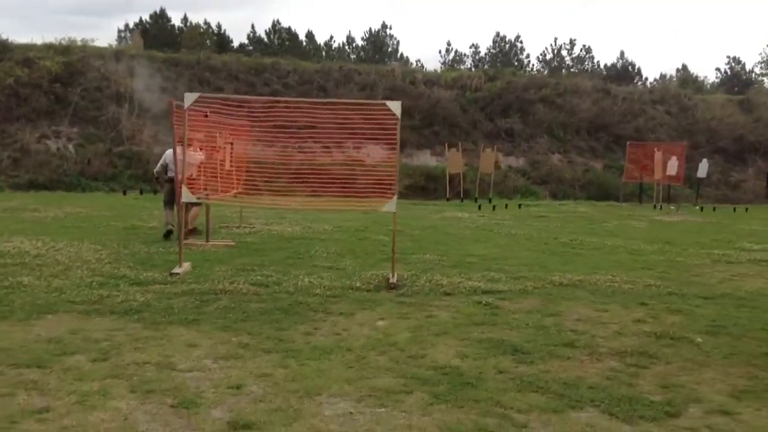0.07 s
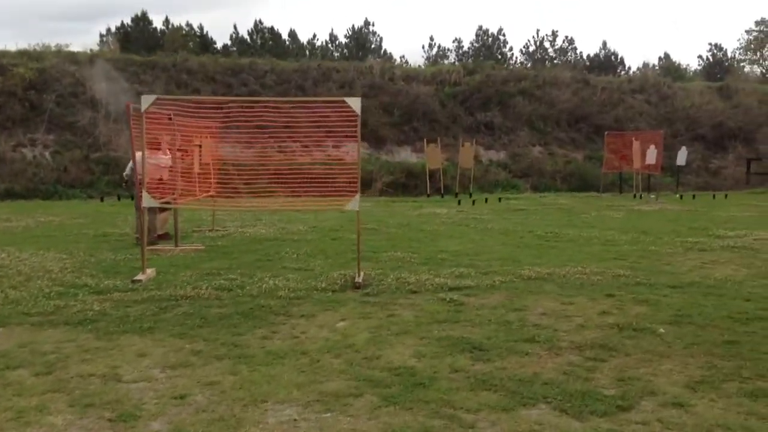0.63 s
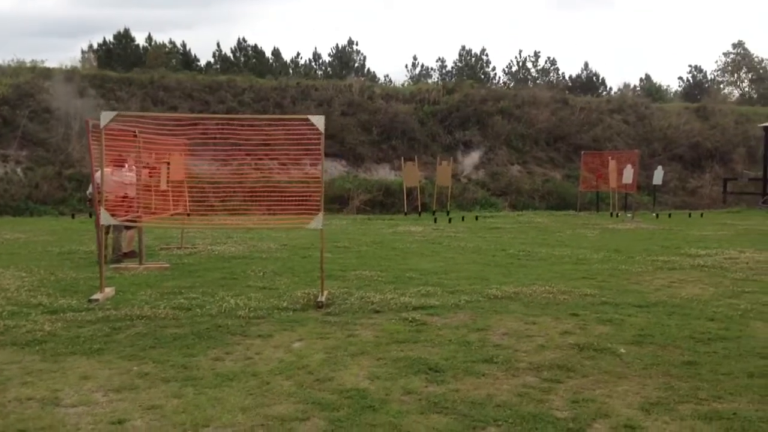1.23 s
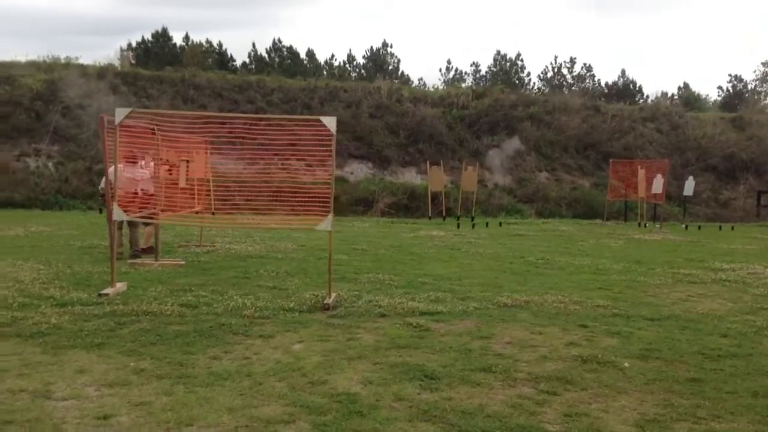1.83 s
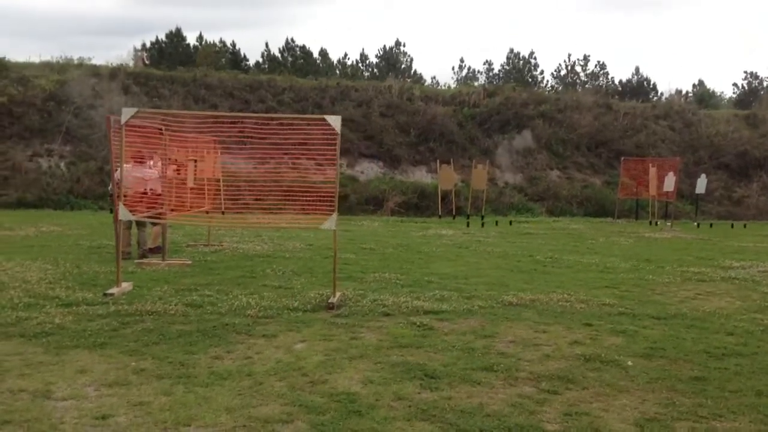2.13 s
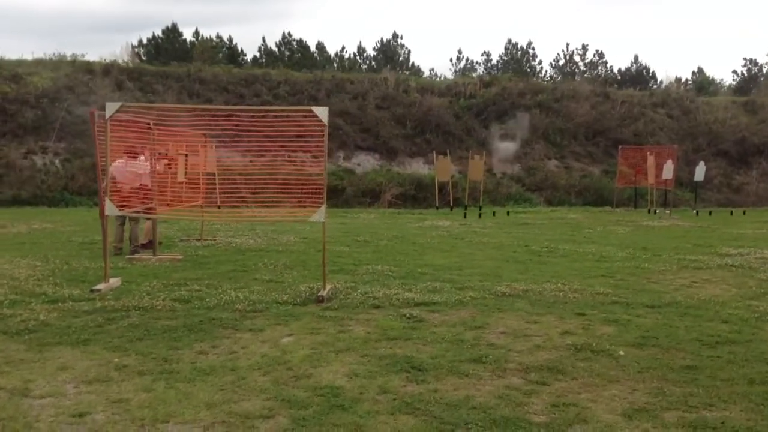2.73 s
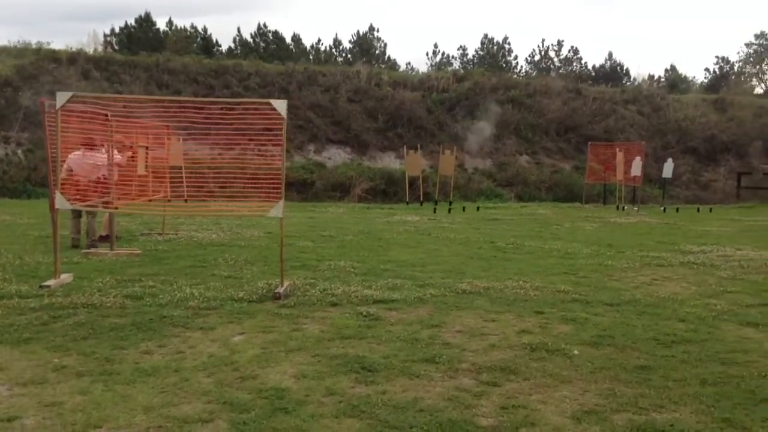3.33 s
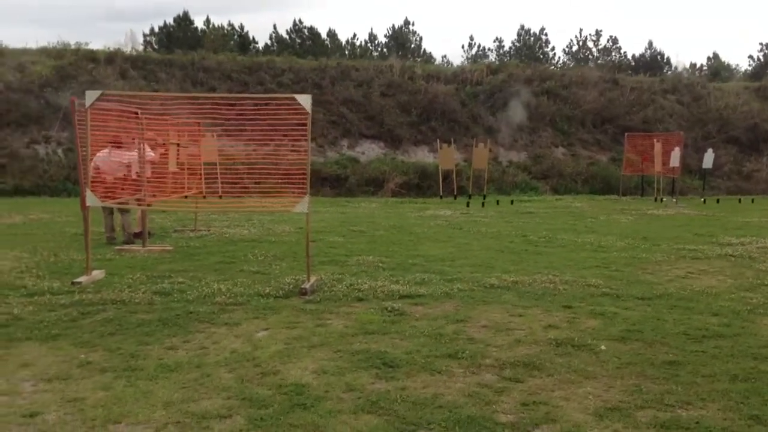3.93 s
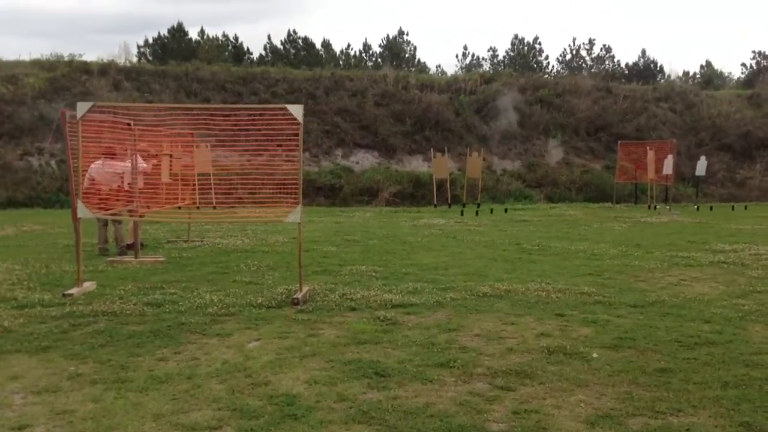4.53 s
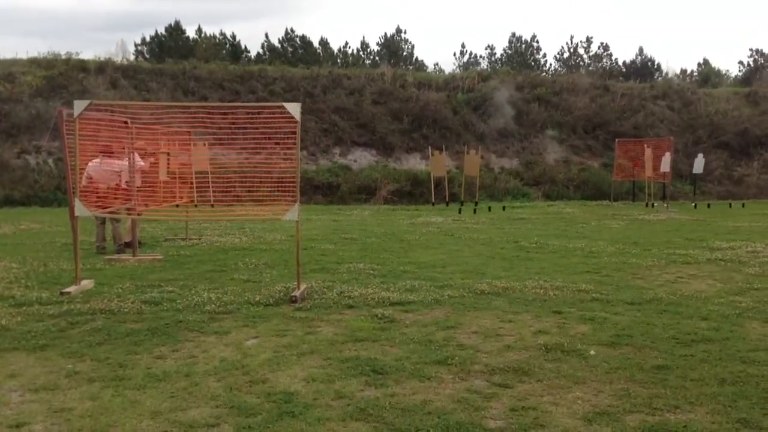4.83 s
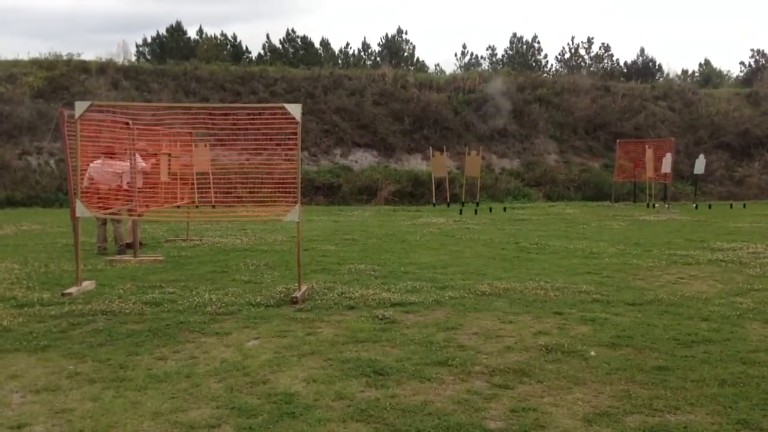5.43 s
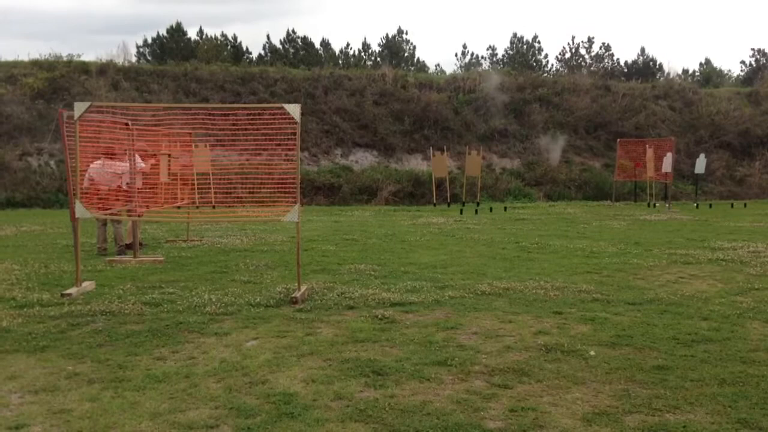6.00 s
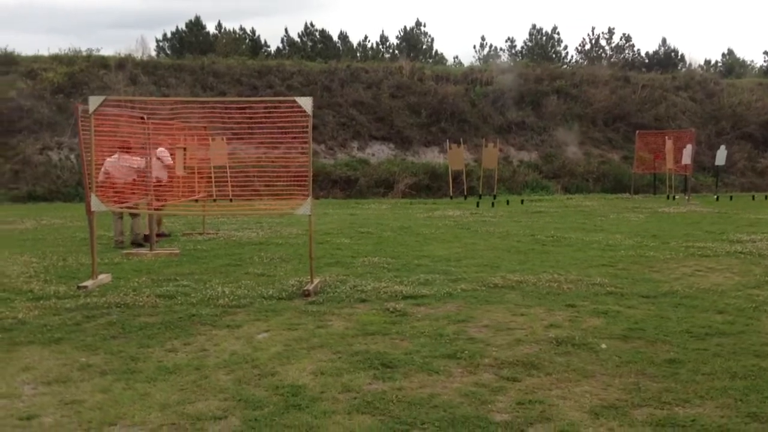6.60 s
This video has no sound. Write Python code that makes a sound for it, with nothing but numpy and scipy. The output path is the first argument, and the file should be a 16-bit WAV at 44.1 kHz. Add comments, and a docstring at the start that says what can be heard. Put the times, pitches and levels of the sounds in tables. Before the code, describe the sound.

A pistol fires four loud single shots across a quiet open field, each echoing briefly off an earth bank and trees.

```python
"""A grass shooting range is quiet at first: a light breeze, microphone hiss, faint knocks, two bird chirps.
Just after one second comes the first of four pistol shots; the shooter steps sideways between them.
Each blast overloads the microphone and makes the recorder turn itself down. The sound slaps back from
the ground, props and an earth bank, then rolls away through the woods while the volume creeps back up.
Small knocks and scuffs fall between the later shots and after the last one."""
import sys
import numpy as np
from scipy import signal
from scipy.fft import rfft, irfft, next_fast_len
from scipy.io import wavfile
from scipy.ndimage import uniform_filter1d, map_coordinates

SR = 44100
rng = np.random.default_rng(int(sys.argv[2]) if len(sys.argv) > 2 else 0)


def file_out(sig):
    """Save sig as 16-bit WAV at sys.argv[1]."""
    # one column per channel
    cols = np.atleast_2d(sig).T
    # limit, then scale
    lim = np.clip(cols, -1, 1)
    pcm = np.round(lim * 32767).astype(np.int16)
    wavfile.write(sys.argv[1], SR, pcm)


N = 293706

# Levels are relative: lower dB means quieter. Rise and decay say how slowly a sound swells and fades.
# Gusts of wind. Each row: peak time in seconds, level in dB, width in seconds.
GUSTS = [(.01, -59, 0.092), (.75, -68.5, 0.11)]
# Knocks and scuffs. Each row: time in seconds, level in dB, decay in seconds, pitch in Hz.
KNOCKS = [(.015, -70.5, 0.089, 2100), (.393, -66, 0.0037, 2090), (2.969, -37.5, 0.0042, 397),
          (3.087, -47, 0.0053, 620), (3.44, -58, 0.027, 2192), (3.593, -52.5, 0.0065, 2090),
          (3.616, -58, 0.0041, 2000), (5.399, -49, 0.0074, 595), (6.438, -44.5, .003, 543),
          (6.626, -50.5, 0.0033, 2140)]
# Bird calls. Each row: start in seconds, first and last pitch in Hz, length in seconds, level in dB.
CHIRPS = [(.185, 2550, 1950, 0.053, -72), (0.237, 2450, 1990, .055, -75)]
# Pistol shots. Each row: time in seconds, blast level in dB, microphone ring in Hz and its level in dB,
# thin tone in Hz and its level in dB, low push in dB, close echoes in dB, share of the walk from 0 to 1.
SHOTS = [(1.181, -1.5, 2083, -3.5, 3090, -8.5, -7.5, -3, 0),
         (2.433, -1, 2092, -5.5, 3006, -6.5, -24.5, -2.5, .4),
         (4.3968, -1.5, 2122, 1.5, 6080, -6.5, -18, -1, .85),
         (5.784, -0.5, 1964, -0.5, 6110, -12.5, -17, -1.5, 0.92)]
# Close echoes off ground, props and bank. Each row: delay and delay lost over the walk in seconds,
# smear level in dB, its rise and decay in seconds, shock level in dB, thud pitch in Hz, thud level in dB.
SLAPS = [(.004, 0.001, -12.5, 0.0011, 0.0034, -31, 261.3, -15),
         (0.0497, .0008, -7, 0.0014, .0012, -8, 614, 5),
         (0.058, .0022, -11.5, 0.00071, .001, -12.5, 230, -10.5),
         (.0644, .0017, -6, 0.0004, 0.0023, -11.5, 696.5, -24.5),
         (0.0739, 0.0027, -13, .0015, 0.0015, -26, 330.6, -12.5),
         (.0920, .0035, -6, .0028, .0028, -15.5, 180, -23.5),
         (.1063, 0.0037, 1, 0.00018, 0.0025, -2.5, 270.8, 2.5),
         (.1230, 0.0018, -14, 0.0016, .003, -26.5, 190, -13)]
# Grass, then props, scattering the blast. Each row: delay in seconds, level in dB, rise and decay in seconds.
PATCHES = [(.002, -30.5, .002, 0.045), (.051, -21.5, 0.006, .05)]
# Echoes off far banks and trees. Each row: delay in seconds, level in dB, spread in seconds,
# thud pitch in Hz, thud level in dB.
FAR_ECHOES = [(0.224, -36.5, 0.01, 174, -38.5), (.357, -47.5, 0.01, 692, -32.5),
              (.44, -52, 0.013, 580, -49), (0.491, -55.5, 0.014, 525, -53), (.545, -59, .012, 130, -54),
              (0.669, -60, 0.024, 263, -56)]

# Tone colours, from bass to treble. Each row: frequency in Hz, level at that frequency in dB.
BREEZE_COLOUR = [(25, 5), (80, 0.5), (160, 8.5), (330, 4.5), (700, 0.5), (1200, -14), (2100, -15.5),
                 (3200, -22.5), (6000, -20), (16000, -34)]
HISS_COLOUR = [(100, -3), (3000, 0.5), (6000, -1.5), (15000, -2.5)]
CLICK_COLOUR = [(30, -24), (300, -18), (500, -16), (1100, -9), (2100, -2.5), (3100, -10), (4000, -13.5),
                (5200, -11), (6100, -8), (6900, -13.5), (10000, -22), (16000, -32)]
SWELL_COLOUR = [(30, -20), (200, -14), (400, 4.5), (850, 0.5), (1150, -17.5), (1700, -1.5), (2200, -5),
                (3000, -0.5), (3800, -27.5), (6000, -36), (16000, -47.5)]
BLAST_COLOUR = [(30, -30.5), (130, -27.5), (350, -10.5), (750, -3), (1150, -8.5), (1650, -2), (2400, -3.5),
                (3100, -6), (4200, -16), (6000, -28), (10000, -49.5), (16000, -51.5)]
SHOCK_COLOUR = [(30, -29.5), (200, -13.5), (650, -3.5), (1100, -5.5), (1900, 3.5), (2500, 0), (3500, -10),
                (5000, -16), (8000, -26), (16000, -35.5)]
SCATTER_COLOUR = [(30, -33.5), (105, -26), (145, -2.5), (195, 3.5), (250, -5), (300, -2), (430, -17.5),
                  (700, -3.5), (1050, -10), (1650, -6), (2300, -2.5), (3300, -8.5), (5000, -23.5),
                  (8000, -40), (16000, -54)]
WOODS_COLOUR = [(30, -37), (90, -14), (150, -17.5), (350, 1), (560, 4.5), (780, -1), (1050, -11.5),
                (1600, -11), (2200, -9), (2800, -18.5), (3400, -14), (4200, -32.5), (6000, -36.5),
                (16000, -68)]


def amp(db):
    """Turn decibels into a number to multiply by."""
    return 10 ** (np.asarray(db) / 20)


def unit(x):
    """Scale a sound to an average power of 1."""
    return x / np.sqrt(np.mean(x ** 2) + 1e-20)


def colour_gains(colour, size):
    """Join the rows of a tone colour into one gain for every frequency."""
    hz, db = np.transpose(colour)
    return amp(np.interp(np.log(np.fft.rfftfreq(size, 1 / SR) + 1), np.log(hz), db))


def noise(colour, size):
    """Steady noise with the given tone colour."""
    padded = next_fast_len(size)
    spectrum = rfft(rng.standard_normal(padded)) * colour_gains(colour, padded)
    return unit(irfft(spectrum, padded)[:size])


def wobble(rate, size):
    """A smooth curve through `rate` random values a second."""
    return map_coordinates(rng.standard_normal(512), [np.arange(size) * rate / SR], mode="wrap")


def burst(t, rise, decay):
    """A loudness curve that swells up to t = 0 and dies away after it."""
    return np.exp(-np.abs(t) / np.where(t < 0, rise, decay))


def add(track, start, sound):
    """Mix a sound into the track, with its start given in seconds."""
    part = track[round(start * SR):][:len(sound)]
    part += sound[:len(part)]


def background(breeze_db=-74, growth_db_per_s=1.77, hiss_db=-68.5):
    """A breeze with small gusts slowly picks up over the grass, while the microphone itself hisses."""
    t = np.arange(N) / SR
    gusts = sum(amp(db) * burst(t - peak, width, width) for peak, db, width in GUSTS)
    strength = np.hypot(amp(breeze_db + growth_db_per_s * t), gusts)
    breeze = strength * amp(.86 * wobble(9, N)) * noise(BREEZE_COLOUR, N)
    return breeze + amp(hiss_db) * noise(HISS_COLOUR, N)


def knocks(lead_s=.01):
    """Things touch with faint, dry knocks, each a puff of noise around one pitch."""
    t = np.arange(SR // 8) / SR - lead_s
    out = np.zeros(N)
    for when, db, decay, hz in KNOCKS:
        colour = [(hz / 8, -25), (hz / 2, -12), (hz, 0), (hz * 2, -17), (hz * 8, -55)]
        add(out, when - lead_s, amp(db) * burst(t, .0017, decay) * noise(colour, len(t)))
    return out


def bird():
    """A far bird whistles twice, sliding down in pitch each time."""
    out = np.zeros(N)
    for start, first_hz, last_hz, length, db in CHIRPS:
        hz = np.linspace(first_hz, last_hz, round(length * SR))
        whistle = np.sin(2 * np.pi * np.cumsum(hz) / SR)
        add(out, start, amp(db) * np.hanning(len(hz)) * whistle)
    return out


def puff(t, rise, decay, colour):
    """A short burst of noise, scaled to the energy of its loudness curve."""
    loudness = burst(t, rise, decay)
    return unit(loudness * noise(colour, len(t))) * np.sqrt(np.mean(loudness ** 2))


def ring(t, hz, cycles):
    """A tone that starts at t = 0 and fades to about a third after `cycles` swings."""
    turns = np.maximum(t, 0) * hz
    return np.sin(2 * np.pi * turns) * np.exp(-turns / cycles)


def thud(t, hz, cycles):
    """A low push that builds over its first swing and dies within a few."""
    return ring(t, hz, cycles) * np.clip(t * hz, 0, 1)


def shot_sound(t, ring_hz, ring_db, tone_hz, tone_db, push_db, click_lead_s=.0225):
    """Just before each blast a faint click sounds and a swell rises; a thin tone swells with the blast, which
    makes the microphone's opening ring."""
    click = amp(-34.5) * puff(t + click_lead_s, .0003, .0011, CLICK_COLOUR)
    fade_in = np.clip((t + click_lead_s) / click_lead_s, 0, 1)
    swell = amp(-14) * fade_in * puff(t, .011, .008, SWELL_COLOUR)
    gas = amp(-7) * puff(t - .0005, .0004, .0028, BLAST_COLOUR)
    crack = amp(-2) * puff(t - .001, .001, .0012, CLICK_COLOUR)
    mic_ring = amp(ring_db) * ring(t, ring_hz, cycles=7)
    thin_tone = amp(tone_db) * burst(t - .001, .0018, .00074) * np.sin(2 * np.pi * tone_hz * t)
    low_push = amp(push_db) * thud(t + .012, hz=40, cycles=.5)
    return click + swell + gas + crack + mic_ring + thin_tone + low_push


def shock(t, size=2048):
    """One clean jump in air pressure at t = 0."""
    # These two lines build a pulse of the right colour with nothing ahead of its start (minimum phase).
    cepstrum = irfft(np.log(colour_gains(SHOCK_COLOUR, size)))[:size // 2]
    front = irfft(np.exp(rfft(2 * cepstrum * (np.arange(size // 2) > 0), size)))
    front *= np.sqrt(SR / 1000 / np.sum(front ** 2))  # the energy of one millisecond at height 1
    return np.interp(np.round(t * SR), np.arange(size), front, left=0, right=0)


def slaps(t, walk, thud_growth_db=3.5):
    """Each close echo is a shock, a smear from the rough surface and a thud; walking shortens its path."""
    out = np.zeros(len(t))
    for delay, lost, smear_db, rise, decay, shock_db, thud_hz, thud_db in SLAPS:
        age = t - delay + walk * lost
        out += amp(shock_db) * shock(age)
        out += amp(smear_db) * puff(age, rise, decay, BLAST_COLOUR)
        out += amp(thud_db + thud_growth_db * (walk - .5)) * thud(age + .00088, thud_hz, cycles=1)
    return out


def scatter(t, bank_s=.1, bank_db=-21, bank_rise_s=.02, bank_fall=2.76, air_loss_db=1.5):
    """Countless weak echoes come off grass, props, banks and trees, duller the farther they travel."""
    near_power = sum((amp(db) * burst(t - delay, rise, decay)) ** 2 for delay, db, rise, decay in PATCHES)
    bank_swell = np.exp(np.minimum(t - bank_s, 0) / bank_rise_s)
    bank = amp(bank_db) * bank_swell * np.maximum(t / bank_s, 1) ** -bank_fall
    flutter = amp(wobble(70, len(t)))
    tail = np.sqrt(near_power + bank ** 2) * (t > 0) * flutter * noise(SCATTER_COLOUR, len(t))
    for delay, db, spread, thud_hz, thud_db in FAR_ECHOES:
        tail += amp(db) * burst(t - delay, spread, spread) * noise(BLAST_COLOUR, len(t))
        tail += amp(thud_db) * thud(t - delay, thud_hz, cycles=2.5)
    hz, age, slices = signal.stft(tail, SR, nperseg=256)
    air_gain = amp(-air_loss_db * age * (hz[:, None] / 3000) ** 2)  # air soaks up treble along the way
    return signal.istft(slices * air_gain, SR, nperseg=256)[1][:len(t)]


def woods(t, first_s=.51, first_db=-57.5, round_trip_s=.63, trip_loss_db=7):
    """A long, hollow roll passes to and fro between the tree lines, weaker on each of four trips."""
    trip = np.arange(4)[:, None]
    age = t - first_s - round_trip_s * trip
    returns = amp(first_db - trip_loss_db * trip) * burst(age, rise=.07, decay=.42)
    flutter = amp(1.9 * wobble(20, len(t)) + 1.86 * wobble(150, len(t)))
    return np.linalg.norm(returns, axis=0) * (t > 0) * flutter * noise(WOODS_COLOUR, len(t))


def pistol(lead_s=.04):
    """Every shot: the blast, its close echoes, the scatter and the far roll."""
    t = np.arange(3 * SR) / SR - lead_s
    early = t[:SR // 4]
    out = np.zeros(N)
    for when, db, ring_hz, ring_db, tone_hz, tone_db, push_db, slaps_db, walk in SHOTS:
        start = when - lead_s
        add(out, start, amp(db) * shot_sound(early, ring_hz, ring_db, tone_hz, tone_db, push_db))
        add(out, start, amp(slaps_db) * slaps(early, walk))
        add(out, start, scatter(t) + woods(t))
    return out


def scene(shots_db=9, knocks_db=2):
    """Gunfire over the quiet range, in one channel."""
    return (amp(shots_db) * pistol() + amp(knocks_db) * knocks() + bird() + background())[None]


def microphone(x, opening_hz=2200, sharpness=6, ring_db=-2):
    """The microphone's small opening boosts one pitch, which sounds nasal."""
    return x + amp(ring_db) * signal.lfilter(*signal.iirpeak(opening_hz, sharpness, fs=SR), x)


def gain_control(x, threshold=.026, depth_db=11.5, recovery_s=.8):
    """Loud sound turns the recorder down at once; the volume then creeps back."""
    t = np.arange(N) / SR
    excess = np.clip(np.abs(x) / threshold - 1, 1e-9, 1)
    # Hold on to each peak and let it fade.
    held = np.exp(np.maximum.accumulate(np.log(excess) + t / recovery_s, axis=-1) - t / recovery_s)
    return x * amp(-depth_db * uniform_filter1d(held, size=128))


def record(dry, low_cut_hz=95, ceiling=.62, hardness=3.5, capacitor_hz=80, top_hz=15500):
    """The recorder trims the bass, turns loud sound down, squashes the peaks and cuts the highest treble."""
    low_cut = signal.butter(2, low_cut_hz, "highpass", fs=SR, output="sos")
    x = gain_control(signal.sosfilt(low_cut, microphone(dry)))
    x = x / (1 + np.abs(x / ceiling) ** hardness) ** (1 / hardness)  # overload
    x = signal.lfilter(*signal.butter(1, capacitor_hz, "highpass", fs=SR), x)  # blocks slow drift
    padded = next_fast_len(N + SR // 4)
    treble_cut = np.clip((top_hz - np.fft.rfftfreq(padded, 1 / SR)) / 900 + .5, 0, 1)
    return irfft(rfft(x, padded) * treble_cut, padded)[:, :N]


dry = scene()
out = record(dry)
file_out(out)
```